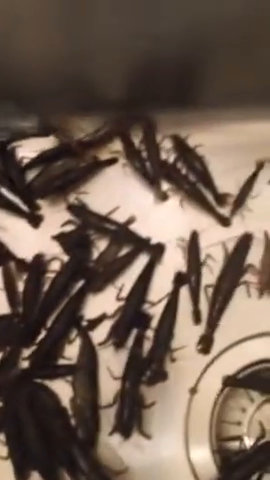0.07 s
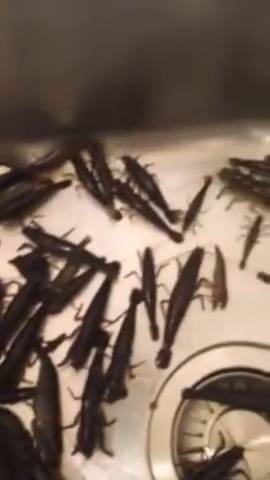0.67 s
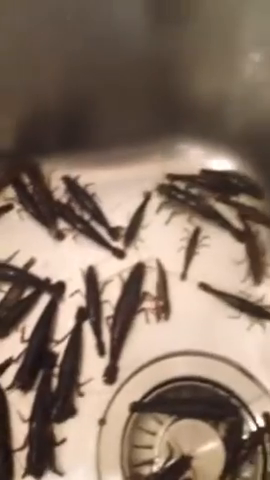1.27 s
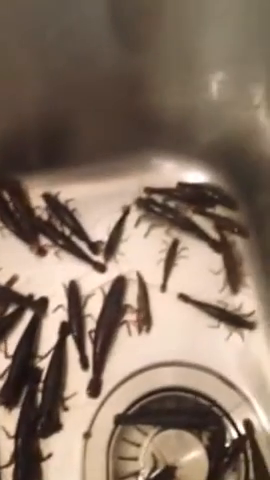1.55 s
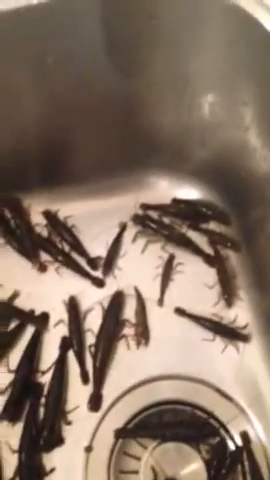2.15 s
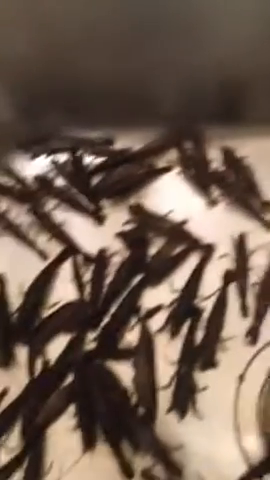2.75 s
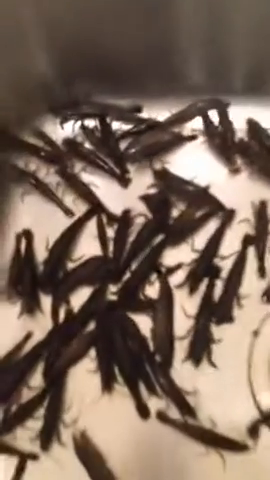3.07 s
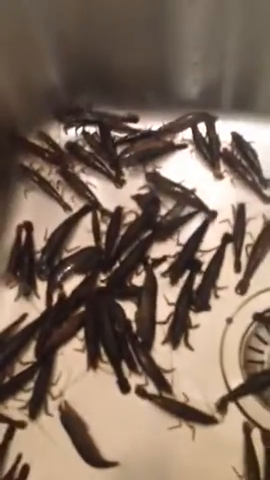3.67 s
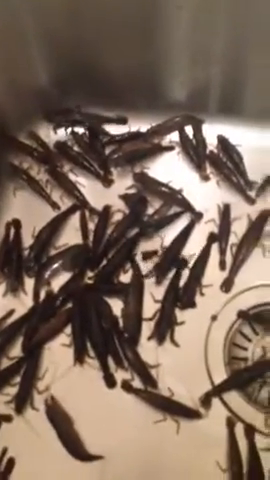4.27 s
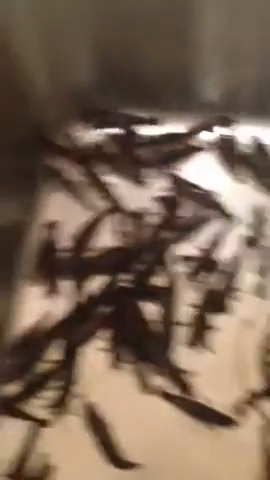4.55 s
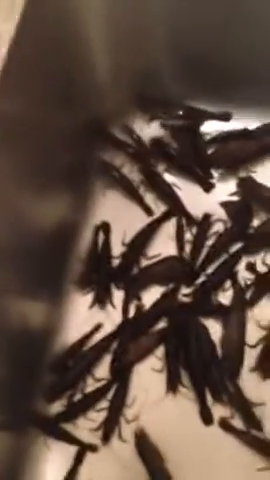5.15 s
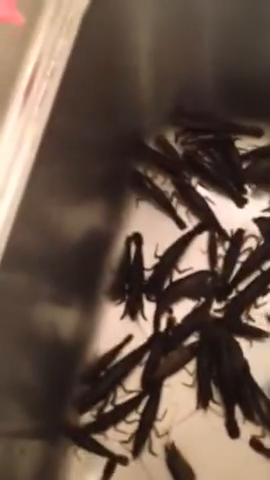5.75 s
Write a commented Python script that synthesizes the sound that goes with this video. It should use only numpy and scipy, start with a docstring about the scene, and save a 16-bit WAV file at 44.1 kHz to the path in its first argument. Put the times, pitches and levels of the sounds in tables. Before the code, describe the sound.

Close up, hard shells knock on a stainless steel sink as crawfish move around, with quiet gaps between the hits. Midway, and again near the end, they rattle into a short, ringing clatter, and the sink floor flexes with soft thumps. Water ticks faintly on the shells throughout, and an appliance hums quietly in the slightly echoing kitchen.

```python
"""Crawfish in a steel sink

Live crawfish shift about in a steel kitchen sink, close to the microphone. Single hard knocks
ring the basin, and its floor flexes with low thumps. Twice a scraping shell breaks into a
bright metallic clatter. Water on the shells crackles faintly all the while.
The kitchen echoes the knocks and the clatter, and an appliance hums behind it all."""
import sys
import numpy as np
from scipy import signal
from scipy.fft import rfft, irfft
from scipy.io import wavfile

SR = 44100
rng = np.random.default_rng(int(sys.argv[2]) if len(sys.argv) > 2 else 0)


def file_out(sig):
    """Save sig as 16-bit WAV at sys.argv[1]."""
    # one column per channel
    cols = np.atleast_2d(sig).T
    # limit, then scale
    lim = np.clip(cols, -1, 1)
    pcm = np.round(lim * 32767).astype(np.int16)
    wavfile.write(sys.argv[1], SR, pcm)


N = 260516
TIME = np.arange(N) / SR
HIT_TIME = TIME[:SR // 3]  # the time one hit has to die away

# Levels are relative. A decay_s is the time to fade by 60 dB. Sound above treble_hz is turned down.
# Knocks on the basin: start_s, level_db, treble_hz, bass_db, echo_db, spot_pitch_hz
KNOCK_HITS = [(0.7305, -0.5, 4500, -3, -2.5, 2030), (2.0147, -4, 4480, -2.5, -1.5, 1350),
              (2.095, -21.5, 2520, 1, 0, 1810), (2.3202, -17, 5000, -3, 2, 3250),
              (2.33, -8, 1490, -1.5, -2, 1210), (2.3509, -15.5, 4500, -8, -3, 1280),
              (2.947, -10, 3900, -11, -2.5, 1650), (3.8708, 0.5, 6000, -11.5, 2, 1970),
              (4.6324, -21, 4470, -1, -7, 1450), (4.9335, 1, 1350, -1.5, -9.5, 1140),
              (5.2336, -28.5, 5000, -6, -2, 2280), (5.2474, -16, 2960, -4.5, -5, 2180),
              (5.475, -25.5, 2820, -15, -3.5, 1200), (5.543, -30.5, 1480, -3, -4, 850),
              (5.832, -8.5, 3020, 1, -4, 1760)]
# Tones the basin rings with after a knock: pitch_hz, level_db, decay_s
BASIN_TONES = [(136, -19.5, 0.14), (300, -15.5, 0.043), (476, -13, 0.041), (664, -46.5, 0.023),
               (850, -5, .04), (1240, -6, .035), (1540, -29, .35), (1785, -29, .4), (1865, -27, .35),
               (1527, -10, 0.029), (1960, -7.5, 0.021), (2360, -9.5, 0.033), (2685, -12.5, 0.021),
               (3280, -30, 0.018), (3680, -7, 0.023), (4180, -1, 0.0089), (4975, -6, 0.019),
               (5510, -6.5, 0.011), (8200, -5, 0.0089)]
# A knock bouncing off the rim and walls of the sink: delay_s, level_db
WALL_BOUNCES = [(.0009, -1.5), (.0023, -4), (.0035, -19), (0.0102, -5), (0.0095, -2.5), (0.0203, -7.5)]
# Tone colour of the blur of later bounces: pitch_hz, gain_db
WALL_EQ = [(100, -7), (700, 9.5), (1800, 7.5), (4500, 1), (8000, 6), (15000, -36)]
# Bright clashes on the steel: start_s, level_db, treble_hz, ring_db, spot_pitch_hz
CLASH_HITS = [(3.1584, -9, 17600, 2.5, 15100), (3.194, -11, 10000, -1, 7700),
              (3.2141, -7, 13100, -5, 14900), (3.2403, -12.5, 9700, -3.5, 14600),
              (4.6325, -36, 9900, -14, 7700), (4.768, -25, 6800, 4, 5800), (4.81, -13, 7850, -10, 12100),
              (4.8322, -4.5, 11200, -3.5, 12100), (4.858, -12.5, 10400, 3, 12200),
              (4.9306, -14, 8800, 0.5, 12300), (5.7563, -36.5, 15000, 0.5, 12200),
              (5.8068, -28, 13400, -3, 12600)]
# Thin ringing tones of the steel: pitch_hz, level_db, decay_s
STEEL_TONES = [(316, -27, .15), (442, -30, .15), (752, -28, .18), (1120, -23, .2), (4125, -24, .06),
               (5757, -24, .18), (5960, -24, .07), (7682, -25, .18), (8686, -28, .2), (9190, -21, .16),
               (9798, -19, .13), (11587, -28, .18), (12120, -21, .18), (12470, -18, .16), (14632, -23, .2),
               (15025, -15, .18)]
# Tone colour of clashes and rattles: pitch_hz, gain_db
STEEL_EQ = [(60, -5), (120, 6), (220, -7), (350, 3.5), (600, 1.5), (1100, -2), (1500, -1), (2200, 3),
            (3300, 1), (6000, 2.5), (10000, 1.5), (15000, -2)]
# Bursts of fast rattling: start_s, attack_s, hold_s, release_s, level_db, treble_hz
RATTLE_MOVES = [(2.312, 0.0033, 0.039, 0.096, -50, 11500), (3.158, .018, 0.092, 0.077, -24.5, 13700),
                (4.732, 0.054, 0.11, 0.049, -26.5, 8700), (4.75, .1, 0.038, 0.057, -31, 1200),
                (4.925, 0.014, 0.0021, 0.047, -28.5, 6000), (5.484, .006, .012, 0.16, -59, 11000),
                (5.701, 0.02, 0.02, .09, -59, 14000), (5.796, 0.023, 0.015, .02, -40, 10700)]
# Scrapes across the basin: start_s, attack_s, hold_s, release_s, level_db, treble_hz
SCRAPE_MOVES = [(1.573, 0.014, .003, 0.023, -61, 2000), (2.683, 0.015, .004, 0.039, -55, 1510),
                (2.924, 0.075, 0.085, 0.1, -36, 6500), (4.546, 0.029, 0.055, 0.16, -54, 10000)]
# Tone colour of a scrape: pitch_hz, gain_db
SCRAPE_EQ = [(100, -10.5), (600, -9), (850, -0.5), (1050, -7.5), (1350, -0.5), (1750, -1.5), (2400, -8.5),
             (4000, -13), (8000, -10), (15000, -11.5)]
# Thumps that flex the sink floor: start_s, level_db
THUMP_HITS = [(2.103, -30), (3.161, -18), (3.22, -24), (4.733, -29.5), (4.750, -22), (4.769, -21),
              (4.836, -22.5), (5.303, -33.5), (5.719, -34.5), (5.755, -33), (5.804, -27.5), (5.833, -16),
              (5.875, -26.5)]
# Low tones of the sink floor: pitch_hz, level_db, decay_s
FLOOR_TONES = [(86, -15.5, 0.05), (112, -3.5, 0.11), (145, -9, 0.11), (216.4, -6.5, 0.058)]
# The clearest wet ticks on the shells: start_s, level_db, pitch_hz
WET_TICKS = [(0.083, -43, 12900), (0.174, -40, 14300), (0.364, -40, 12300), (0.5137, -39, 13900),
             (0.5474, -41.5, 10600), (2.5433, -40, 13400), (5.4202, -40, 13200)]
# Tone colour of the wet crackle: pitch_hz, gain_db
CRACKLE_EQ = [(1000, -12.5), (4000, 2.5), (8000, -1), (15000, 4)]
# How long the kitchen echoes: pitch_hz, decay_s
KITCHEN_DECAY = [(120, 0.31), (400, 0.43), (1000, 0.72), (2800, 0.67), (6000, 0.7), (10000, 0.4),
                 (15000, 0.45)]
# Tone colour of a knock's echo: pitch_hz, gain_db
KNOCK_ECHO_EQ = [(120, 1.5), (300, -4.5), (600, -0.5), (1000, -12), (1400, -3.5), (1750, -4), (2400, -8.5),
                 (4000, -7), (6000, -14.5), (9000, -16.5), (15000, -16.5)]
# Tone colour of the clatter's echo: pitch_hz, gain_db
CLATTER_ECHO_EQ = [(120, -8.5), (700, -1.5), (2500, -9), (7000, -9.5), (14000, -12.5)]
# Tones of the humming appliance: pitch_hz, level_db
HUM_TONES = [(48.6, -61.5), (100.5, -62), (172, -78), (297, -72), (398, -68)]
# Tone colour of the room's rumble and hiss: pitch_hz, gain_db
ROOM_NOISE_EQ = [(25, -6.5), (50, -1), (75, -9), (130, -4.5), (200, -6.5), (300, -18.5), (420, -15.5),
                 (550, -23), (1000, -27), (1500, -32.5), (2800, -35), (7000, -39), (12500, -39),
                 (16000, -51.5)]


def knocks():
    """Each knock is a crack and a short basin ring with a faint after-ring; the walls throw it back."""
    out = np.zeros(N)
    crack = amp(-6) * tick(hz=2960, cycles=0.52)
    for start_s, db, treble_hz, bass_db, echo_db, spot_hz in KNOCK_HITS:
        near = amp(-12.5) * ring(BASIN_TONES, lag_s=0.00012, spread=0.45)
        near += amp(-20) * colour(blur(decay_s=.07, rise_s=.004), WALL_EQ)
        add(near, 0, crack)
        for delay_s, wall_db in WALL_BOUNCES:
            add(near, delay_s, amp(wall_db) * crack)
        sound = amp(echo_db + 17) * kitchen_echo([1.], KNOCK_ECHO_EQ)  # a knock hits the room as a pulse
        add(sound, 0, near)
        sound = struck_spot(sound, spot_hz, sharpness=5.6, db=-3)
        bass_eq = [(60, bass_db - 15.5), (130, bass_db), (400, bass_db), (1200, 0)]
        add(out, start_s, amp(db) * colour(soften(sound, treble_hz), bass_eq))
    return out


def clatter():
    """Hard clashes with rattling and scraping between them, each echoed by the kitchen."""
    out = np.zeros(N)
    for source, rows in ((clash, CLASH_HITS), (rattle, RATTLE_MOVES), (scrape, SCRAPE_MOVES)):
        for start_s, *settings in rows:
            sound = source(*settings)
            add(out, start_s, sound)
            add(out, start_s, kitchen_echo(sound, CLATTER_ECHO_EQ))
    return out


def clash(db, treble_hz, ring_db, spot_hz, rebound_s=.004):
    """A hard hit makes the steel zing, and a lighter rebound follows at once."""
    crash, rebound = (amp(-4.5) * colour(blur(decay_s=0.047, rise_s=0.00013), STEEL_EQ) for _ in range(2))
    add(crash, rebound_s, amp(-6.5) * rebound)
    zing = ring(STEEL_TONES, lag_s=0.00022, spread=0.32)
    zing = struck_spot(zing, spot_hz, sharpness=12, db=0.5)
    return amp(db) * soften(crash + amp(ring_db) * zing, treble_hz)


def rattle(attack_s, hold_s, release_s, db, treble_hz, db_per_octave=11):
    """Shells chatter on the steel and set it ringing; more force makes them louder and brighter."""
    _, force_db = push(attack_s, hold_s, release_s, swell_db=23.5)
    taps = chatter(treble_hz * 2 ** (force_db / db_per_octave), per_s=1900, uneven_db=3.5, decay_s=0.012)
    shells = amp(db + force_db) * normalise(colour(taps, STEEL_EQ))
    sound = amp(-35) * signal.fftconvolve(shells, ring(STEEL_TONES, lag_s=.0003))
    add(sound, 0, shells)
    return sound


def scrape(attack_s, hold_s, release_s, db, treble_hz, octaves_per_s=13):
    """A shell drags over the basin, fastest and brightest just before it lets go."""
    t, force_db = push(attack_s, hold_s, release_s, swell_db=12.5)
    octaves_down = octaves_per_s * abs(t - attack_s - hold_s)
    taps = chatter(treble_hz / 2 ** octaves_down, per_s=1700, uneven_db=6.0, decay_s=0.025)
    return amp(db + force_db) * normalise(colour(taps, SCRAPE_EQ))


def push(attack_s, hold_s, release_s, swell_db, fade_db=29):
    """The times and force (in dB) of one movement: it builds, holds and lets go."""
    turns_s = np.cumsum([0, attack_s, hold_s, release_s])
    t = np.arange(0, turns_s[-1], 1 / SR)
    return t, np.interp(t, turns_s, [-swell_db, 0, 0, -fade_db])


def chatter(treble_hz, per_s, uneven_db, decay_s):
    """A run of tiny taps, each a burst of noise, whose brightness follows the changing treble_hz."""
    t = TIME[:len(treble_hz)]
    strength = np.minimum(rng.exponential(1, SR)[:len(t)], 3)
    lands = rng.random(SR)[:len(t)] < per_s / SR
    noise = rng.standard_normal(SR)[:len(t)]
    taps = amp(uneven_db * strength) * lands
    power = signal.lfilter([1], [1, -amp(-60 / (decay_s * SR)) ** 2], taps ** 2)  # each tap dies away
    hz, frame_s, spectrum = signal.stft(np.sqrt(power) * noise, SR, nperseg=128)
    treble_cut = np.sqrt(1 + (hz[:, None] / np.interp(frame_s, t, treble_hz)) ** 4)
    return signal.istft(spectrum / treble_cut, SR, nperseg=128)[1][:len(t)]


def thumps(lowest_hz=80):
    """The sink floor flexes and booms briefly, with little deep bass below its low tones."""
    out = np.zeros(N)
    for start_s, db in THUMP_HITS:
        add(out, start_s, amp(db) * ring(FLOOR_TONES, lag_s=0.0016, spread=0.35))
    return signal.sosfilt(signal.butter(3, lowest_hz, "high", fs=SR, output="sos"), out)


def ring(tones, lag_s=0., spread=0.):
    """Fading tones of sheet steel: low ones travel slower and come later; spread varies their mix."""
    hz, db, decay_s = np.transpose(tones)[:, :, None]
    t = np.maximum(HIT_TIME - lag_s * np.sqrt(hz.max() / hz) + lag_s, 0)
    weight = 1 + spread * rng.standard_normal(hz.shape)
    return (weight * amp(db - 60 * t / decay_s) * np.sin(2 * np.pi * hz * t)).sum(0)


def blur(decay_s, rise_s):
    """Countless close tones and echoes blur into a fading noise."""
    noise = rng.standard_normal(len(HIT_TIME))
    return noise * amp(-60 * HIT_TIME / decay_s) * (1 - np.exp(-HIT_TIME / rise_s))


def struck_spot(x, hz, sharpness, db):
    """Each spot of the sink rings most strongly near one pitch."""
    band = signal.iirpeak(min(hz, SR / 2 - 500), sharpness, fs=SR)
    return x + amp(db) * signal.lfilter(*band, x)


def soften(x, treble_hz):
    """A softer hit leaves out the treble."""
    return signal.sosfilt(signal.butter(2, min(treble_hz, SR / 2 - 500), fs=SR, output="sos"), x)


def wet_crackle(per_s=340, uneven_db=5.0, level_db=-62, snap_s=0.00034):
    """Films of water and small bubbles snap on the shells, each for a fraction of a millisecond."""
    out = np.zeros(N)
    pitches = np.linspace(5000, 15000, 16)
    for hz in pitches:
        strength = np.minimum(rng.exponential(1, N), 3.2)
        snaps = amp(uneven_db * strength) * (rng.random(N) < per_s / len(pitches) / SR)
        out += amp(level_db) * signal.oaconvolve(snaps, tick(hz, cycles=hz * snap_s))[:N]
    for start_s, db, hz in WET_TICKS:
        add(out, start_s, amp(db) * tick(hz, cycles=hz * snap_s))
    out = colour(out, CRACKLE_EQ)
    return out + amp(-22.5) * signal.oaconvolve(out, blur(decay_s=0.027, rise_s=0.00022))[:N]


def tick(hz, cycles):
    """A tiny snap: a tone that fades almost as soon as it starts."""
    cycles_done = TIME[:200] * hz
    return np.exp(-cycles_done / cycles) * np.sin(2 * np.pi * cycles_done)


def kitchen_echo(x, echo_eq):
    """Dense random echoes, different for every spot in the sink, each pitch fading at its own speed."""
    hz, t, spectrum = signal.stft(rng.standard_normal(SR), SR, nperseg=256)
    decay_s = look_up(KITCHEN_DECAY, hz)[:, None]
    fading = spectrum * amp(-60 * t / decay_s) / np.sqrt(decay_s)
    tail = signal.istft(fading, SR, nperseg=256)[1][:SR]
    tail *= 1 - np.exp(-(TIME[:SR] / 0.00095) ** 2)  # the echo takes a moment to build
    return signal.fftconvolve(x, colour(tail / np.linalg.norm(tail), echo_eq))


def appliance_hum():
    """An appliance hums with a few low tones that waver in pitch and loudness."""
    hum = np.zeros(N)
    for hz, db in HUM_TONES:
        tone = np.sqrt(2) * np.sin(2 * np.pi * hz * TIME + 0.97 * drift(rate_hz=4.3))
        hum += amp(db) * tone * (1 + 0.054 * drift(rate_hz=3.8))
    return hum


def room_noise(level_db=-54.5):
    """The steady low rumble and hiss of the room."""
    gain = amp(look_up(ROOM_NOISE_EQ, np.fft.rfftfreq(N, 1 / SR)))
    return amp(level_db) * normalise(irfft(rfft(rng.standard_normal(N)) * gain, N))


def drift(rate_hz):
    """Slow random wandering with a typical size of one."""
    hz = np.fft.rfftfreq(N, 1 / SR)
    return normalise(irfft(rfft(rng.standard_normal(N)) * np.exp(-(hz / rate_hz) ** 2), N))


def colour(x, eq, size=4096):
    """Turns pitches up or down by a table of pitch_hz, gain_db, adding no sound ahead of a hit."""
    log_gain = np.log(amp(look_up(eq, abs(np.fft.fftfreq(size, 1 / SR)))))
    response = np.exp(np.conj(signal.hilbert(log_gain)))
    kernel = np.fft.ifft(response).real[:size // 2]
    return signal.oaconvolve(x, kernel)[:len(x)]


def look_up(table, hz):
    """Reads between the rows of a table, giving each octave about equal room."""
    pitches, values = np.transpose(table)
    return np.interp(np.log(hz + 1), np.log(pitches + 1), values)


def amp(db):
    """Turns decibels into a multiplier."""
    return 10 ** (np.asarray(db) / 20)


def normalise(x):
    """Scales a signal to an average size (rms) of one."""
    return x / np.sqrt(np.mean(x ** 2) + 1e-20)


def add(mix, start_s, sound):
    """Lays a sound into the mix at start_s."""
    part = mix[max(round(start_s * SR), 0):][:len(sound)]
    part += sound[:len(part)]


def scene():
    """Everything reaches one microphone, alike in both channels."""
    mono = knocks() + clatter() + thumps() + wet_crackle() + appliance_hum() + room_noise()
    return np.array([mono, mono])


def record(dry):
    """The microphone loses the deepest bass and the very highest treble."""
    lowest_hz, highest_hz = 36, 15450
    lean = signal.sosfilt(signal.butter(4, lowest_hz, "high", fs=SR, output="sos"), dry)
    treble_cut = signal.firwin(511, highest_hz, window=("kaiser", 9), fs=SR)
    return signal.oaconvolve(lean, treble_cut[None], "same")


dry = scene()
out = record(dry)
file_out(out)
```